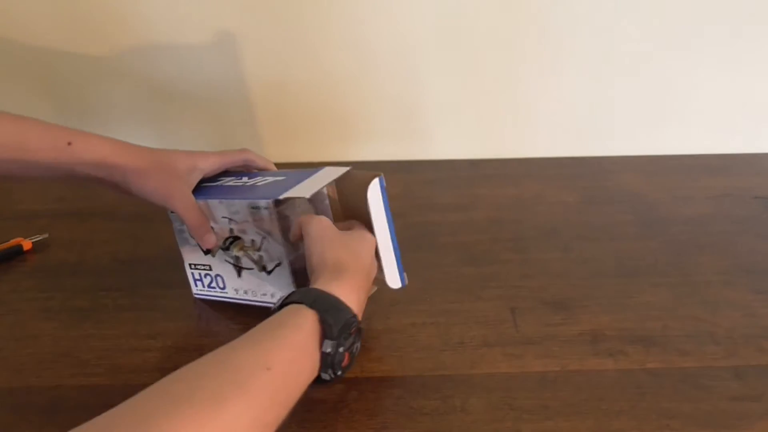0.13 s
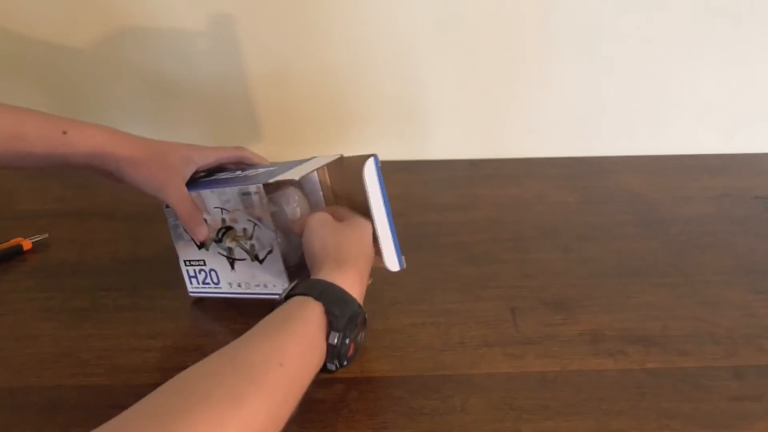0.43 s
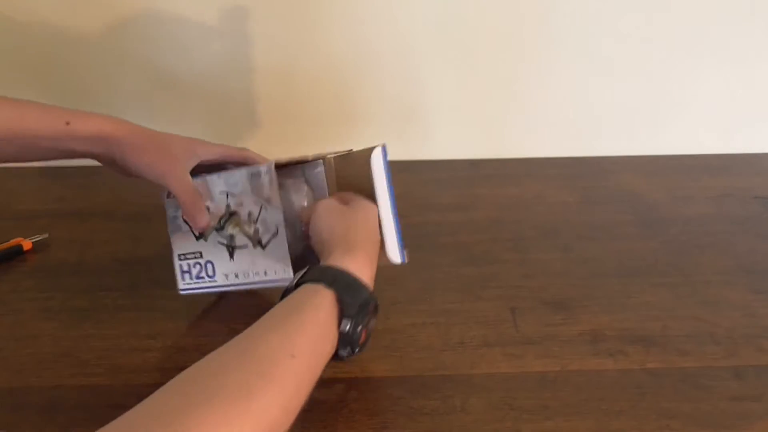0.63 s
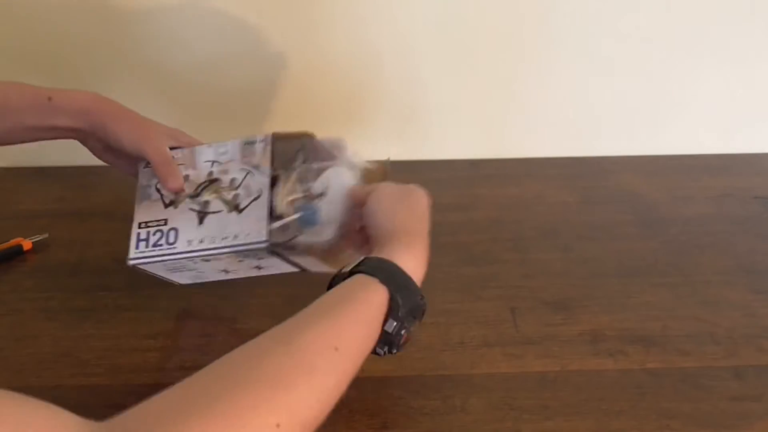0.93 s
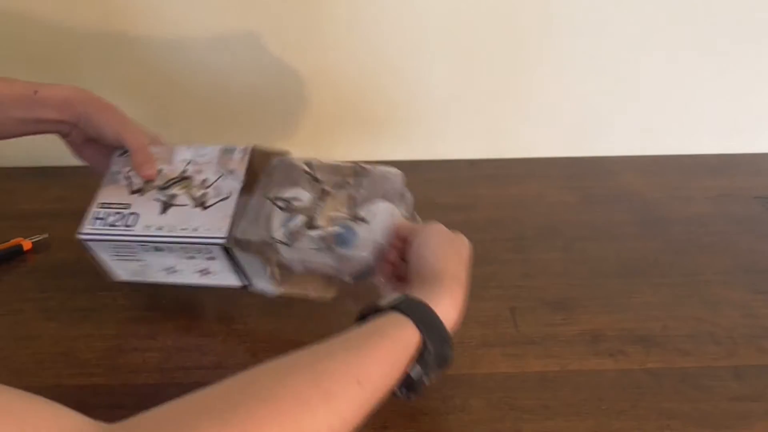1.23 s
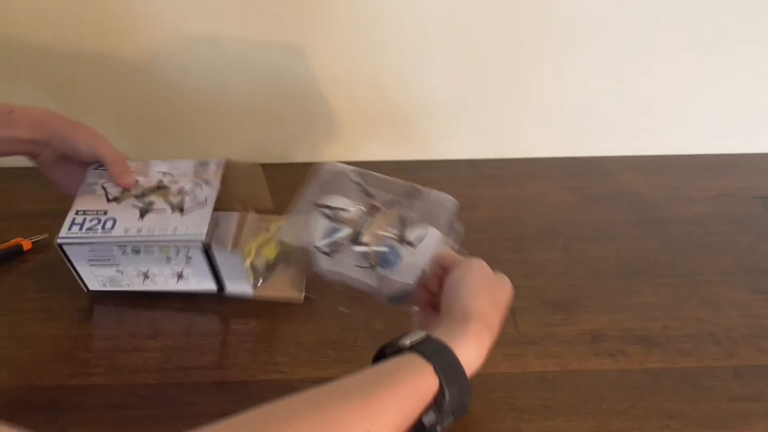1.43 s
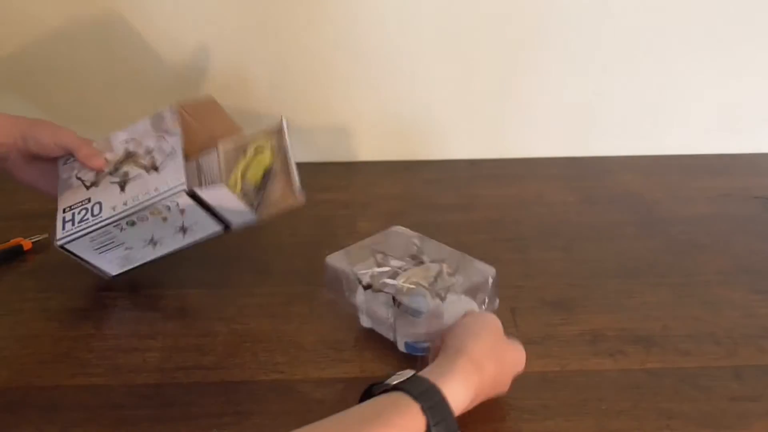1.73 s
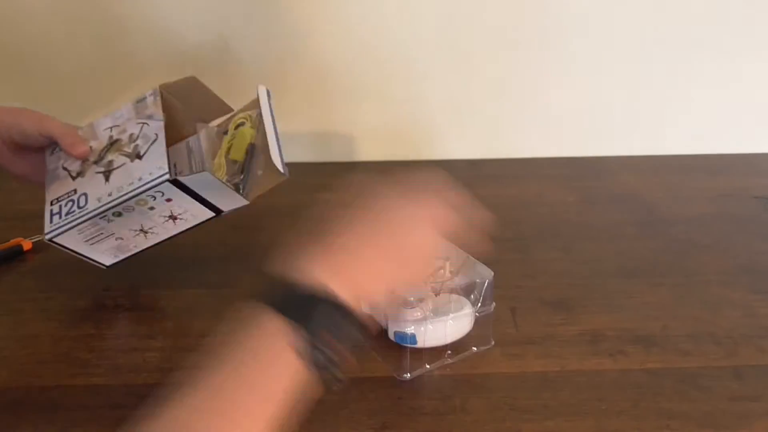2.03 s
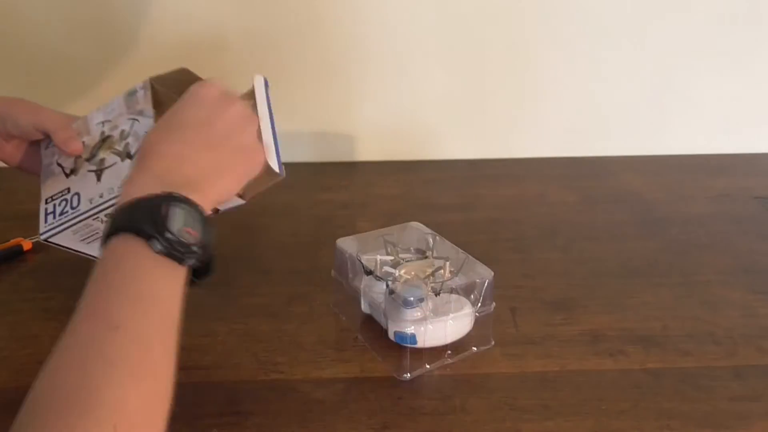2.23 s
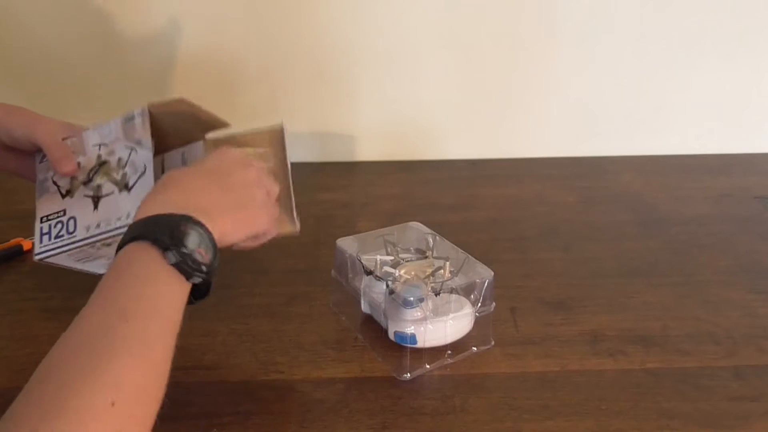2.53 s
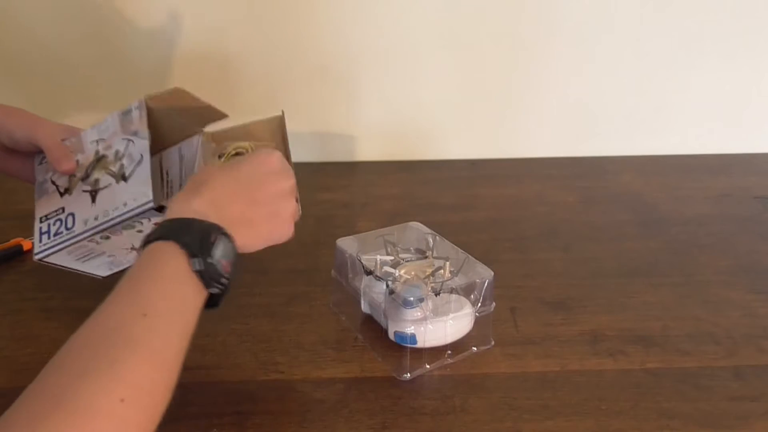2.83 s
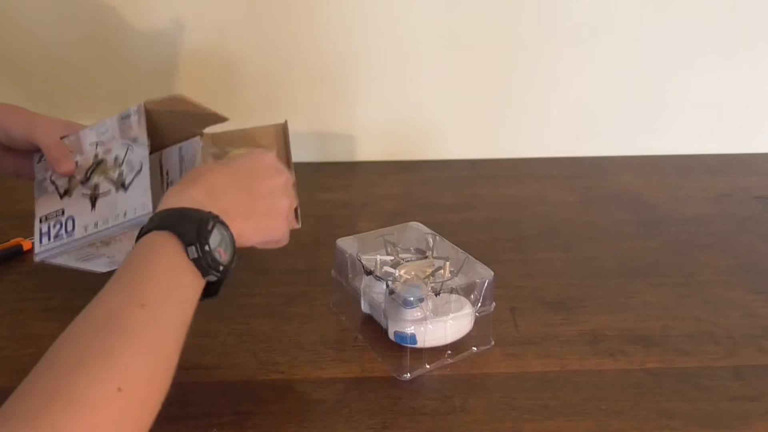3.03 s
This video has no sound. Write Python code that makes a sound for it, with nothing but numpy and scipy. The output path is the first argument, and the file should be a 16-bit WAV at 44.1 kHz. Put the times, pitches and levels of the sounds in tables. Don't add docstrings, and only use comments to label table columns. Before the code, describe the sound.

A clear plastic tray scrapes and crackles out of a cardboard box in a small room

```python
import sys
import numpy as np
from scipy import signal
from scipy.fft import rfft, irfft
from scipy.io import wavfile
from scipy.ndimage import uniform_filter1d

SR = 44100
rng = np.random.default_rng(int(sys.argv[2]) if len(sys.argv) > 2 else 0)


def pcm_store(signal):
    levels = np.round(np.clip(np.atleast_2d(signal), -1, 1) * 32767)
    wavfile.write(sys.argv[1], SR, levels.astype(np.int16).T)


def gain_from_db(level_db):
    decades = np.asarray(level_db, float) / 20
    return 10 ** decades


N = 141120


def in_time(seconds):
    return np.arange(int(seconds * SR)) / SR


def rms_one(x):
    return x / np.sqrt(np.mean(x ** 2) + 1e-20)


def at_hz(points, hz):
    p = np.array(points)
    return np.interp(np.log(np.maximum(hz, 1)), np.log(p[:, 0]), p[:, 1])


def colour(x, spectrum, share=1):
    n = x.shape[-1]
    hz = np.arange(n // 2 + 1) * SR / n
    return irfft(rfft(x) * gain_from_db(share * at_hz(spectrum, hz)), n)


def bandpass(x, low_hz, high_hz):
    sos = signal.butter(2, [low_hz, high_hz], "band", fs=SR, output="sos")
    return signal.sosfilt(sos, x)


def resonate(x, hz, width_hz):
    r = np.exp(-np.pi * width_hz / SR)
    poles = [1, -2 * r * np.cos(2 * np.pi * hz / SR), r * r]
    return signal.lfilter([(1 - r * r) / 2, 0, (r * r - 1) / 2], poles, x)


def drift(rate_hz):
    r = np.exp(-2 * np.pi * rate_hz / SR)
    noise = rng.standard_normal(N + SR) * (1 - r) ** 2
    return rms_one(signal.lfilter([1], [1, -2 * r, r * r], noise)[SR:])


def add(out, start_s, sound):
    i = int(start_s * SR)
    out[i:i + len(sound)] += sound[:len(out) - i]


def grains(per_s, spread_db, clump_db):
    sizes = gain_from_db(spread_db * np.minimum(rng.exponential(1, N), 4)) * rng.choice([-1, 1], N)
    chance = per_s * gain_from_db(clump_db * drift(70)) / SR
    return sizes * (rng.random(N) < chance) + 1e-18


# start in seconds, length in seconds, hiss in dB, box rumble in dB,
# extra level of the upper hiss in dB.
STROKES = [(.0, 0.07, -52, -42, 1.5), (0.081, 0.26, -61.5, -46, 1.5), (0.278, 0.036, -60, -36.5, -2),
           (0.304, 0.012, -46, -50, -2), (0.381, 0.021, -45, -40, -7), (0.441, 0.053, -41.5, -34, -4.5),
           (0.507, 0.039, -47.5, -39, -2), (0.588, 0.036, -44, -38, 2.5), (1.55, 0.048, -40.5, -47.5, -6.5),
           (0.709, 0.02, -44, -40, -2), (0.763, 0.075, -49, -45, 0), (0.834, 0.094, -44, -37, 4.5),
           (0.965, 0.1, -53.5, -45, 1), (1.08, 0.054, -46.5, -45, 7), (1.12, 0.052, -32.5, -31.5, -4.5),
           (1.206, 0.16, -48.5, -40, 3.5), (1.37, 0.1, -56.5, -50, 2), (1.453, 0.046, -51, -43, -0.5),
           (1.706, 0.0097, -50, -34.5, 1.5), (1.831, 0.019, -51, -34.5, 0.5), (1.878, .03, -49.5, -36, -4),
           (1.895, 0.022, -46.5, -32.5, 1.5), (1.949, 0.027, -53, -43, -6), (2.31, 0.08, -56, -50.5, 0),
           (2.365, 0.069, -57, -49.5, 2.5), (2.5, 0.056, -44.5, -48.5, -2.5),
           (2.528, 0.033, -42.5, -45.5, -1), (2.593, 0.041, -47.5, -44.5, 2.5),
           (2.688, 0.14, -51.5, -51.5, 1), (2.794, 0.033, -41.5, -42.5, -1), (2.838, 0.028, -61.5, -60, 8),
           (2.917, .1, -56.5, -50, 3), (3.092, 0.059, -54, -51.5, 0.5), (3.154, 0.099, -60, -50.5, 7)]


def pressure(column, bright=False):
    rise_s, fall_s = 0.0081, 0.029
    first_touch = 0.45
    t, power = np.arange(N) / SR, np.zeros(N)
    for row in STROKES:
        since = t - row[0]
        bite = np.clip(since / rise_s, 0, 1)
        swell = np.clip(first_touch + 2 * since / row[1] * (1 - first_touch), 0, 1)
        fade = np.exp(-np.maximum(since - row[1], 0) / fall_s)
        power += (gain_from_db(row[column] + bright * row[-1]) * bite * swell * fade) ** 2
    return np.sqrt(power)


# frequency in Hz, level in dB.
BOX = [(180, -2.5), (268, 4), (306, -3.5), (368, -9.5), (442, 7.5), (576, 7.5), (690, 8.5), (840, 5.5),
       (1134, 3), (1330, 3.5), (1580, -4.5), (2130, -18.5)]


def box(slips):
    damping, wander_db = 0.24, 2.2
    total = 0
    for k, (hz, db) in enumerate(BOX):
        strength = (-1) ** k * gain_from_db(db + wander_db * drift(14))
        total = total + strength * resonate(slips, hz, hz * damping)
    return rms_one(total)


# frequency in Hz, density in dB per Hz.
HISS = [(880, -40), (1500, -14.5), (4260, -1), (6110, -6), (10700, -6), (13800, -9.5), (15900, -38.5),
        (16500, -70)]
# frequency in Hz, width in Hz, level in dB.
TRAY = [(2100, 250, 6.5), (4220, 170, -6.5), (4760, 100, -9.5), (9090, 230, -3.5), (10460, 1200, -8)]


def slide():
    fine = grains(per_s=7600, spread_db=4.0, clump_db=3.4)
    crackles = gain_from_db(11) * grains(per_s=200, spread_db=2.13, clump_db=3.2)
    slips = colour(fine + crackles, HISS)
    slips = slips + sum(gain_from_db(db + 2.0 * drift(8.0)) * resonate(slips, hz, width) for hz, width, db in TRAY)

    edges, split_hz, patch_db = np.geomspace(600, 18000, 13), 7000, 2.2
    low, high = np.zeros(N), np.zeros(N)
    for k, (bottom, top) in enumerate(zip(edges, edges[1:])):
        patch = (-1) ** k * gain_from_db(patch_db * drift(25)) * bandpass(slips, bottom, top)
        if bottom * 1.15 > split_hz:
            high += patch
        else:
            low += patch
    hiss = pressure(column=2) * low + pressure(column=2, bright=True) * high
    rumble = box(grains(per_s=1600, spread_db=1.77, clump_db=2.5))
    return hiss / np.std(low + high) + pressure(column=3) * rumble


# start in seconds, peak in dB, pitch in Hz,
# time to fall by 60 dB in seconds.
KNOCKS = [(0.111, -23.5, 406, 0.026), (0.15, -25, 508, 0.023), (0.233, -20.5, 965, 0.03),
          (0.27, -19.5, 1315, 0.027), (0.275, -15, 543, 0.046), (0.295, -21.5, 576, 0.052),
          (0.596, -15.5, 564, 0.037), (0.612, -27, 597, 0.054), (0.768, -17.5, 434, 0.034),
          (0.786, -24, 533, 0.029), (0.844, -18.5, 516, 0.047), (0.873, -34, 460, 0.035),
          (1.099, -25.5, 319, 0.052), (1.126, -10, 1124, 0.0096), (1.478, -29, 445, 0.03),
          (1.5425, -12.5, 732, 0.017), (1.714, -30, 311, 0.036), (1.834, -24, 413, 0.018),
          (1.843, -30, 1560, 0.02), (1.901, -27, 890, 0.027), (1.909, -22.5, 475, 0.027),
          (1.926, -31, 437, 0.011), (2.321, -33.5, 485, 0.016), (2.375, -30.5, 698, 0.039),
          (2.383, -29.5, 674, 0.035), (2.386, -39, 372, 0.11), (2.412, -37.5, 759, 0.07),
          (2.455, -52, 766, 0.05), (2.506, -37, 398, 0.034), (2.525, -37.5, 316, 0.046),
          (2.545, -41.5, 375, 0.19), (2.647, -29.5, 814, 0.032), (2.768, -18, 408, 0.018),
          (3.172, -30.5, 370, 0.016)]
# ratio to its pitch, level in dB.
OVERTONES = [(.7, -13), (0.999, 5), (1.171, -18), (1.502, -6.5), (2.2, -12), (3.1, -16.5)]


def knocks():
    lag_s, gain_db, contact_hz = 0.000948, -1.5, 1410
    thud_db, thud_t60_s = -9.5, 0.019
    out, t = np.zeros(N), in_time(0.25)
    ratio, level_db = np.transpose(OVERTONES)
    uneven = level_db < -3
    contact = 1 - np.exp(-2 * np.pi * contact_hz * t / 10)
    for s, db, hz, t60 in KNOCKS:
        detune, strength = rng.standard_normal((2, len(ratio)))
        f = hz * ratio * (1 + 0.016 * detune * uneven)
        level = gain_from_db(level_db + 2.2 * strength * uneven)
        decay = gain_from_db(-60 * t * np.sqrt(ratio)[:, None] / t60)
        modes = level[:, None] * np.sin(2 * np.pi * f[:, None] * t) * decay
        rough = rng.standard_normal(len(t))
        for _ in range(2):
            rough = resonate(rough, 1.45 * hz, 1.53 * hz)
        thud = rms_one(rough) * gain_from_db(thud_db - 60 * t / (thud_t60_s + t60))
        knock = contact * (modes.sum(axis=0) + thud)
        knock = signal.lfilter(*signal.butter(2, hz / 2, "high", fs=SR), knock)
        add(out, s + lag_s, gain_from_db(db + gain_db) * knock)
    return out


# start in seconds, peak in dB, brightest frequency in Hz,
# time to fall by 60 dB in seconds.
SNAPS = [(0.043, -25.5, 6950, 0.013), (0.15, -31, 4600, 0.0043), (0.2057, -30.5, 10100, 0.017),
         (0.2354, -14.5, 4600, 0.0057), (0.2718, -23.5, 2940, 0.014), (0.296, -22, 2610, 0.016),
         (0.3148, -28.5, 7000, 0.011), (0.3722, -33.5, 4040, 0.011), (0.455, -29, 5700, 0.0048),
         (0.4758, -32, 4600, 0.022), (0.4957, -6.5, 5190, 0.0091), (0.63, -31.5, 3970, 0.01),
         (0.769, -31, 2460, 0.012), (1.1297, -11, 5500, 0.02), (1.136, -20, 4570, 0.028),
         (1.161, -16.5, 10000, 0.016), (1.3784, -28, 5760, 0.015), (1.487, -31.5, 3780, 0.017),
         (1.544, -5.5, 10400, 0.009), (1.8334, -36.5, 4520, 0.0071), (1.906, -33, 4370, 0.014),
         (2.3754, -32, 9600, 0.0077), (2.509, -41, 4610, 0.013), (2.5516, -27, 11200, 0.024),
         (2.58, -29, 10800, 0.012), (2.649, -32, 2710, 0.0085), (2.7061, -25, 5740, 0.012),
         (2.801, -24, 9600, 0.0039), (2.812, -31, 7600, 0.016), (3.1934, -31.5, 3440, 0.014)]
# start in seconds, peak in dB, pitch in Hz.
TICKS = [(.0265, -35, 7780), (.0474, -42, 6500), (0.065, -41, 6820), (.1181, -38, 11500),
         (0.174, -36, 9000), (0.2007, -38, 10000), (.3274, -39, 9000), (0.3956, -37, 8800),
         (.4124, -44, 4460), (0.451, -27, 4450), (0.4627, -29, 5800), (.4674, -30, 5360),
         (0.4818, -28, 11000), (0.5967, -26, 3750), (.7223, -35, 12300), (0.8447, -31.5, 3600),
         (.8724, -28.5, 4400), (1.3444, -33, 10500), (1.71, -37, 4350), (2.5172, -33, 4570),
         (2.5844, -31, 7300), (2.6324, -29, 3370), (2.6773, -35, 7000), (2.7134, -34.5, 3160),
         (2.7656, -37, 10600), (2.7866, -38, 7500), (2.8184, -28, 9110), (2.8254, -35, 8000),
         (2.9572, -35.5, 8860), (3.1263, -33, 10600)]
# frequency in Hz, density in dB per Hz.
SNAP = [(350, -8), (600, -14), (2240, -2), (2720, -6.5), (3440, -4), (10400, -8), (16500, -12)]


def snaps():
    rise_s, gain_db, peak_db, evenness = 0.00052, -9.5, 7, 0.55
    below_db, above_db = 5, 7
    tick_t60_s, tick_db = 0.0061, -0.5
    out, t = np.zeros(N), in_time(0.03)
    rows = SNAPS + [(s, db + tick_db, hz, tick_t60_s) for s, db, hz in TICKS]
    for s, db, hz, t60 in rows:
        burst = rng.standard_normal(len(t)) * (1 - np.exp(-t / rise_s)) * gain_from_db(-60 * t / t60)
        spread = rfft(burst)
        burst = irfft(spread / np.abs(spread) ** evenness, len(t))
        burst = colour(burst, SNAP) * gain_from_db(-15 * t / t60)
        slopes = [(hz / 8, -3 * below_db), (hz, 0), (hz * 8, -3 * above_db)]
        burst = colour(burst, slopes, share=min(1, (-7 - db) / 20))
        burst = burst + gain_from_db(peak_db) * resonate(burst, hz, 0.3 * hz)
        add(out, s, gain_from_db(db + gain_db + 8.5) * burst / np.abs(burst).max())
    return out


def puffs():
    puff_db, puff_s = -53, 0.001
    out, t = np.zeros(N), in_time(0.03)
    gust = np.e * t / puff_s * np.exp(-t / puff_s)
    for s, db, hz, t60 in SNAPS:
        if db > -10:
            add(out, s, gain_from_db(db + 8 + puff_db) * gust)
    return out


# start in seconds, level in dB.
THUMPS = [(.005, -40), (0.202, -35), (.64, -49), (0.849, -37), (1.715, -38), (1.833, -42.5), (1.909, -41)]
# frequency in Hz, width in Hz, level in dB.
TABLE = [(123.5, 74, -4.5), (169.4, 54, -0.5), (271, 92, -2)]


def thumps():
    t60_s, swell_s = 0.33, 0.013
    push, t = np.zeros(N), in_time(0.29)
    for s, db in THUMPS:
        add(push, s, gain_from_db(db - 60 * t / t60_s) * (1 - np.exp(-t / swell_s)))
    shake, wood = rng.standard_normal(N), 0
    for hz, width, db in TABLE:
        mode = resonate(resonate(shake, hz, width), hz, 2 * width)
        wood = wood + gain_from_db(db) * mode / np.sqrt(width)
    return push * rms_one(wood)


# frequency in Hz, time to fall by 60 dB in seconds.
ROOM_T60 = [(100, 0.82), (400, 0.35), (3000, 0.59), (7000, 0.41), (15000, 0.12)]
# frequency in Hz, level in dB.
ROOM_TONE = [(100, -4), (600, -1.5), (2500, -4.5), (9000, -12.5), (15000, -10.5)]
# frequency in Hz, level of side relative to mid in dB.
ROOM_SIDE = [(200, -9.5), (2000, -4.5), (12000, 5.5)]


def room(x):
    gap_s, evenness = 0.00047, 0.7
    t, edges, tail = in_time(0.7), 60 * 2 ** np.arange(0, 8.6, 0.5), 0
    white = rng.standard_normal((2, 2, len(t)))
    for k, (low, high) in enumerate(zip(edges, edges[1:])):
        hz = np.sqrt(low * high)
        t60 = at_hz(ROOM_T60, hz)
        decay = gain_from_db(at_hz(ROOM_TONE, hz) - 60 * t / t60)
        unit_energy = np.sqrt(2 * np.log(1000) / t60 / SR)
        tail = tail + bandpass(white[k % 2], low, high) * decay * unit_energy
    spread = rfft(tail)
    even = np.sqrt(uniform_filter1d(np.abs(spread) ** 2, size=80)) / np.abs(spread)
    tail = irfft(spread * np.minimum(even, 2) ** evenness, len(t))
    tail = tail * np.exp(-(t / 0.45) ** 4) * np.clip(t / gap_s - 0.5, 0, 1)
    mid, side = signal.fftconvolve(x[None], tail, axes=1)[:, :N]
    return mid + colour(side, ROOM_SIDE) * [[1], [-1]]


# frequency in Hz, level in dB.
FLOOR = [(15, -59.5), (25, -26.5), (108, -7.5), (252, -4.5), (368, -0.5), (399, -8), (2750, -28.5),
         (14800, -24), (16500, -69)]


def floor():
    level_db, side_db = -64.5, -1
    mid, side = colour(rng.standard_normal((2, N)), FLOOR)
    return gain_from_db(level_db) * (mid + gain_from_db(side_db) * side * [[1], [-1]]) / np.std(mid)


# frequency in Hz, left minus right in dB.
LEAN = [(60, -1.5), (380, -1), (2380, 0), (15000, -3.5)]


def scene():
    hands = slide() + knocks() + snaps() + thumps()
    mic_cut = signal.butter(3, 117, "high", fs=SR, output="sos")
    hands = signal.sosfilt(mic_cut, hands)
    heard = hands + room(hands) + puffs() * gain_from_db([[-2.0], [1.5]])
    left, right = colour(heard[0], LEAN, 0.5), colour(heard[1], LEAN, -0.5)
    return np.array([left, right]) + floor()


def low_pass(x):
    return signal.sosfilt(signal.butter(12, 15300, fs=SR, output="sos"), x)


def record(dry):
    return low_pass(dry)


dry = scene()
out = record(dry)
pcm_store(out)
```